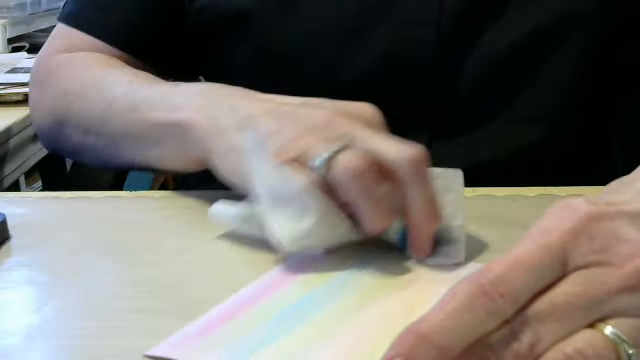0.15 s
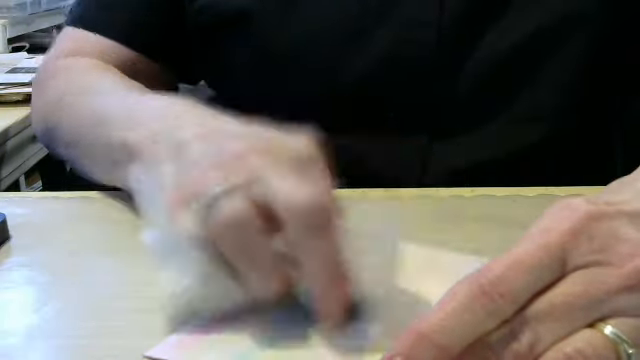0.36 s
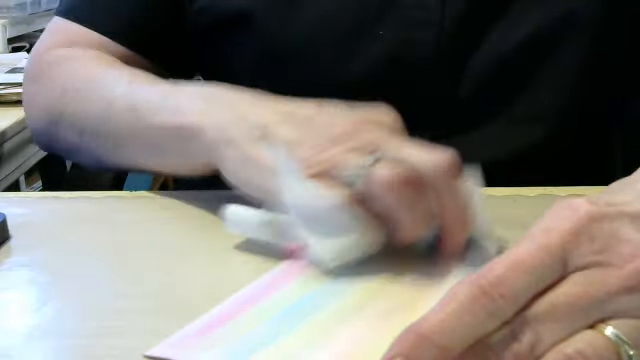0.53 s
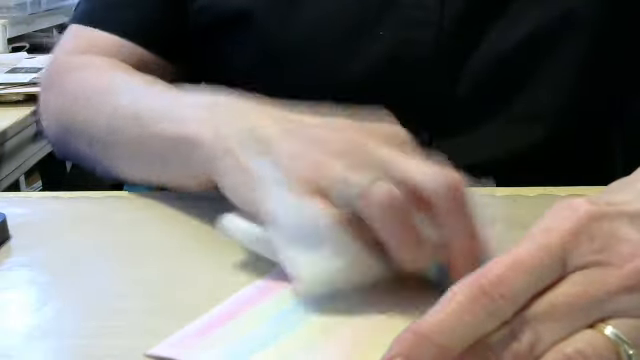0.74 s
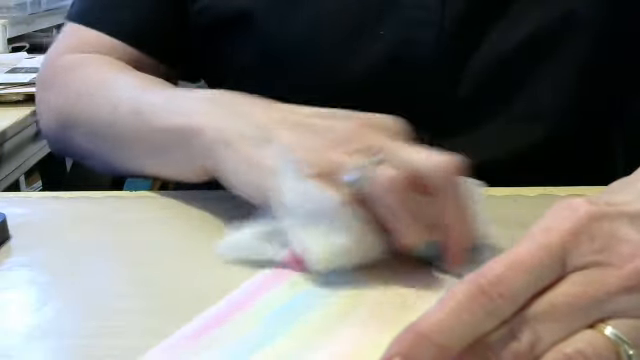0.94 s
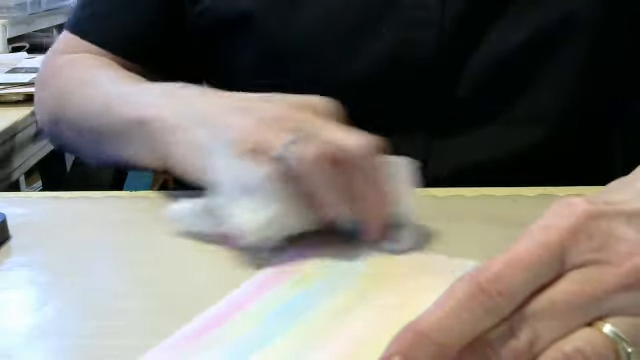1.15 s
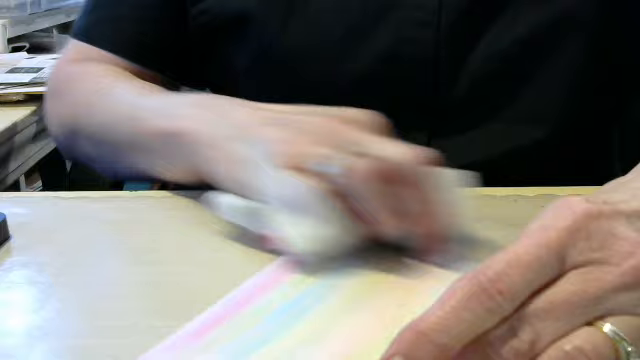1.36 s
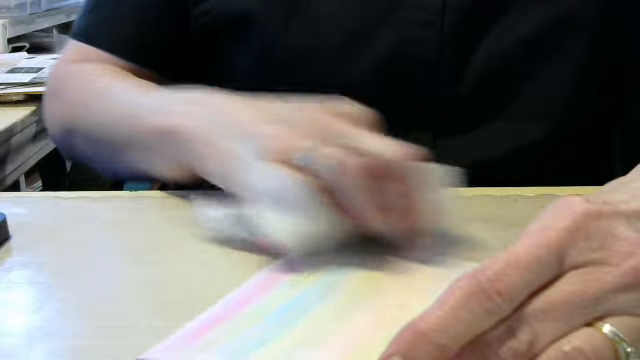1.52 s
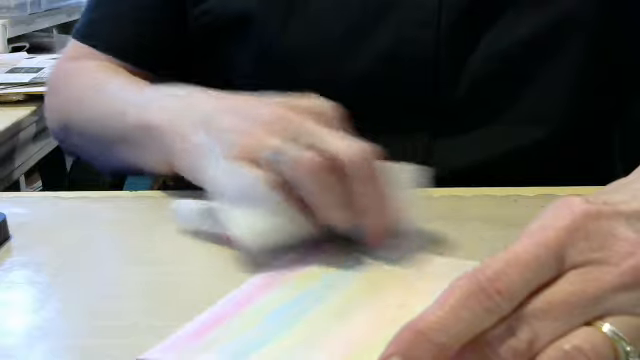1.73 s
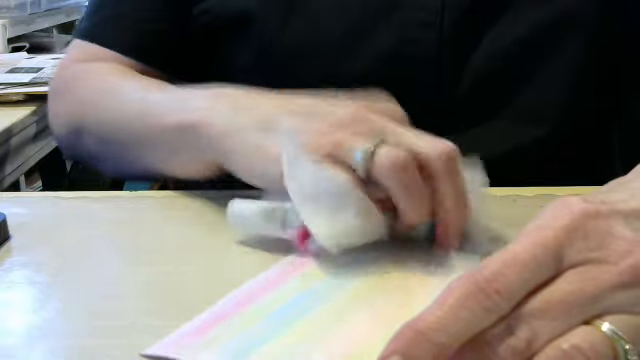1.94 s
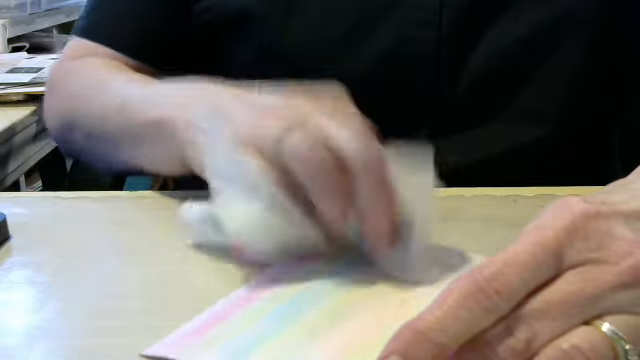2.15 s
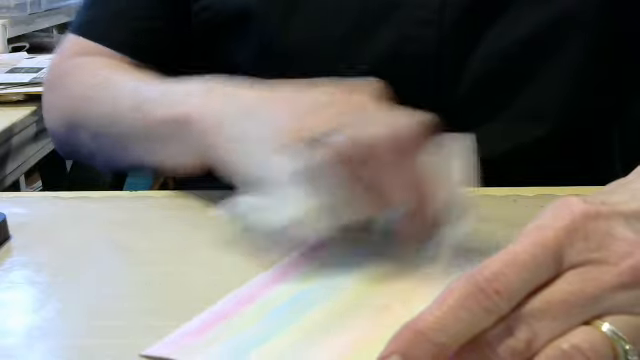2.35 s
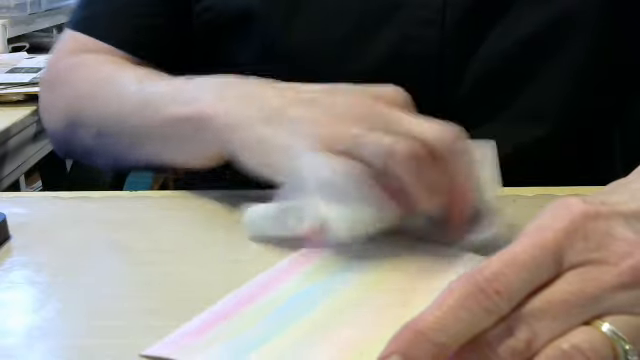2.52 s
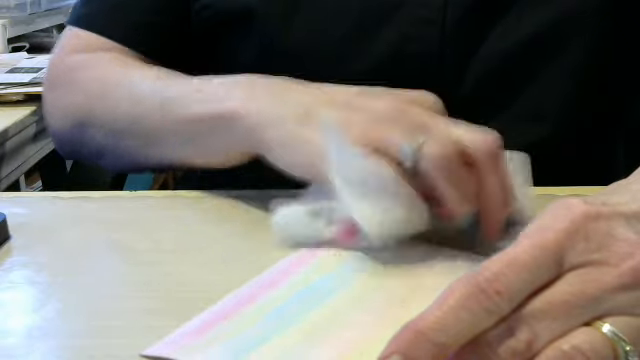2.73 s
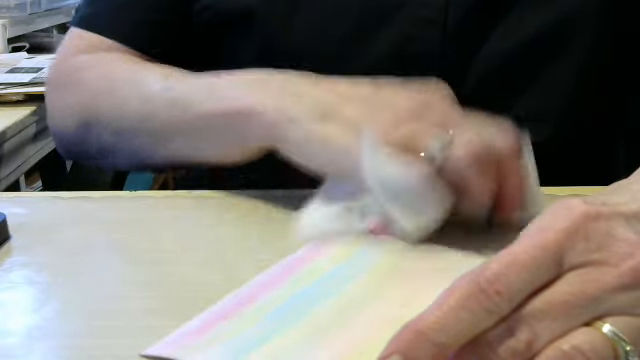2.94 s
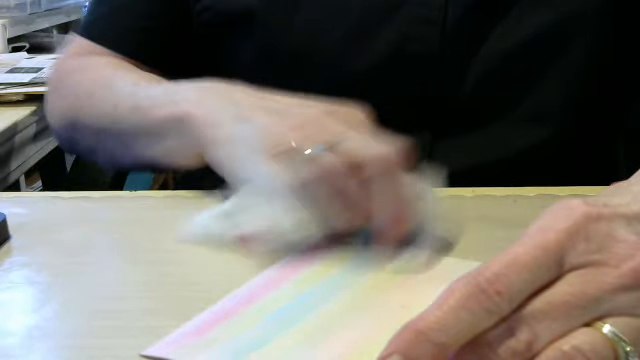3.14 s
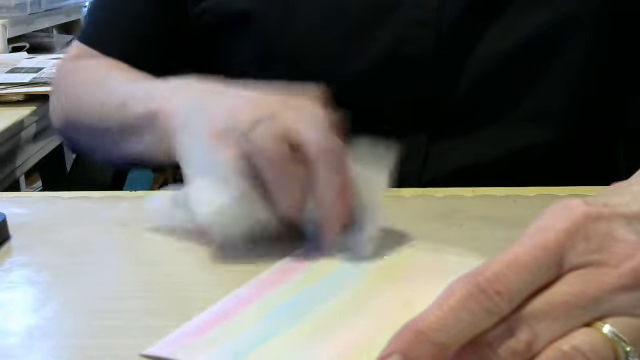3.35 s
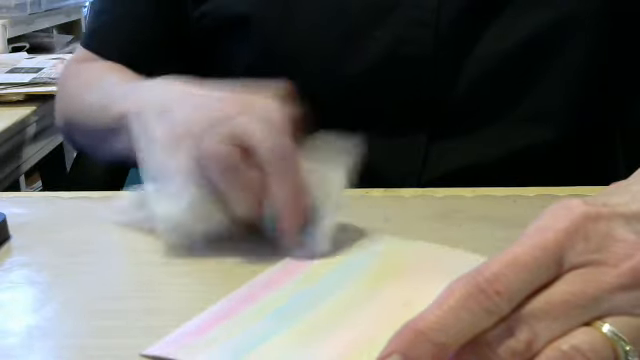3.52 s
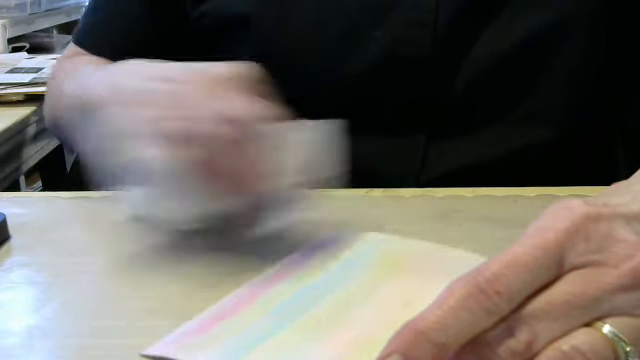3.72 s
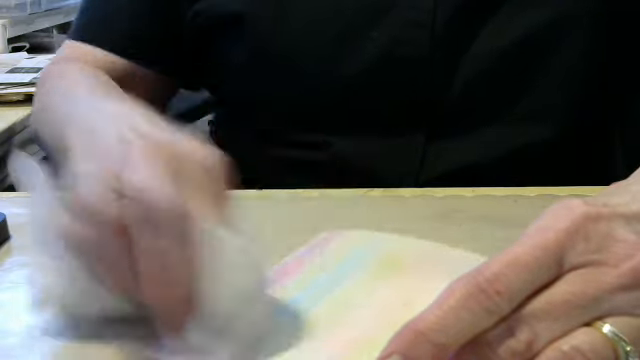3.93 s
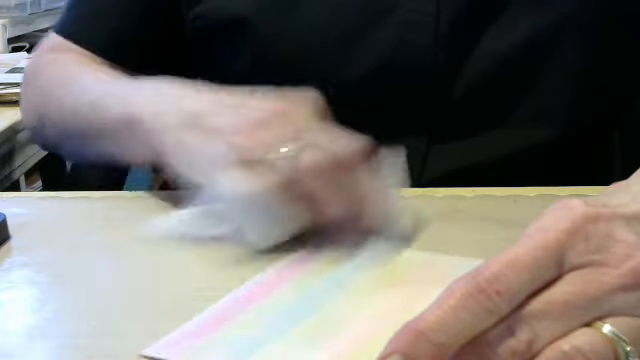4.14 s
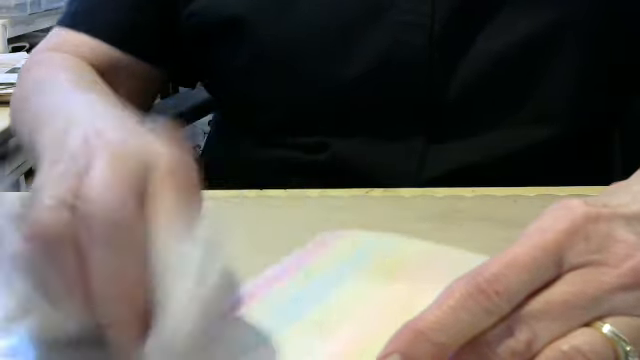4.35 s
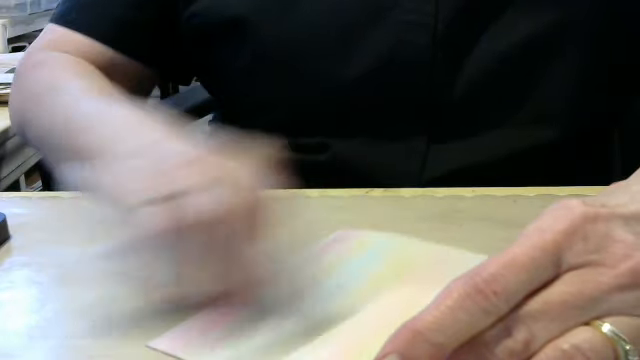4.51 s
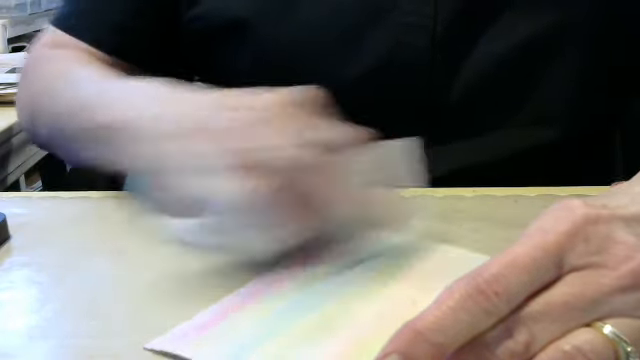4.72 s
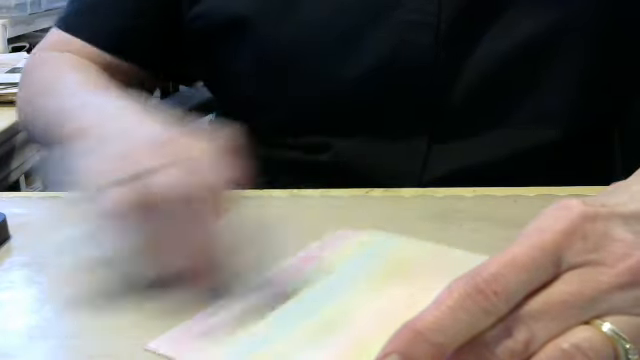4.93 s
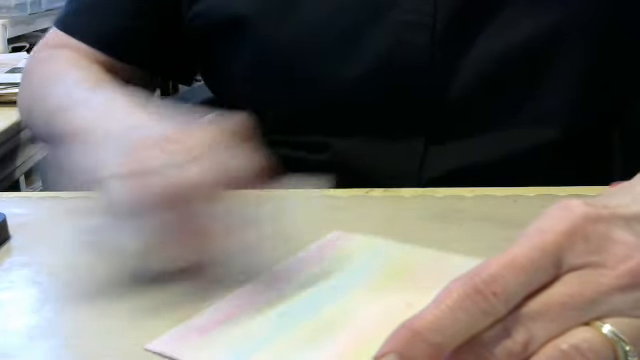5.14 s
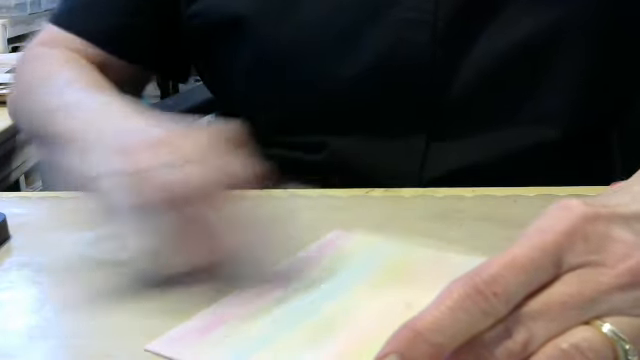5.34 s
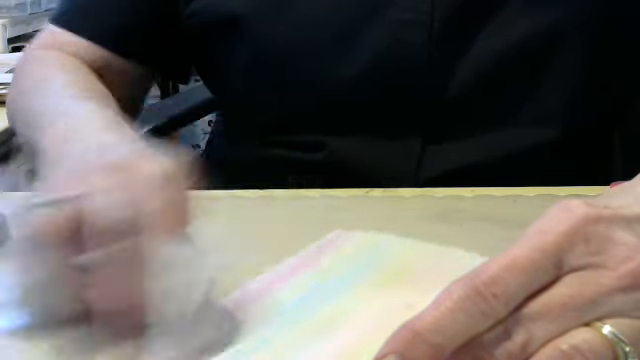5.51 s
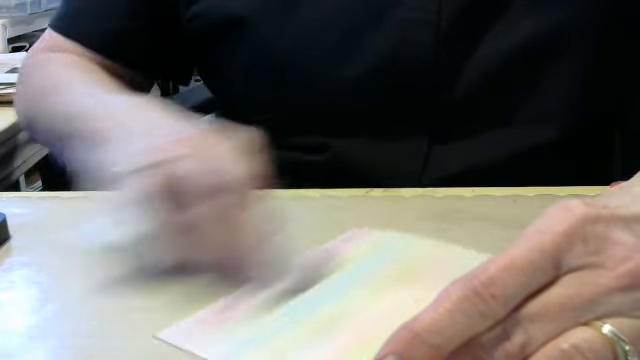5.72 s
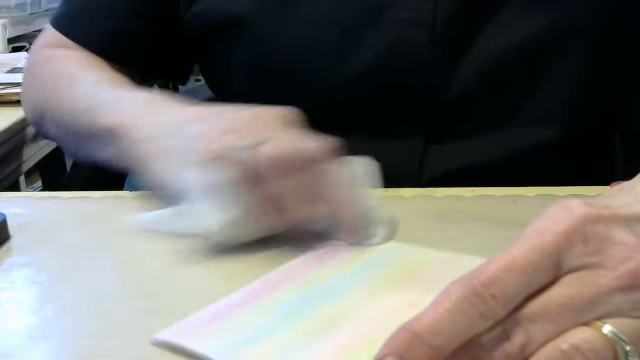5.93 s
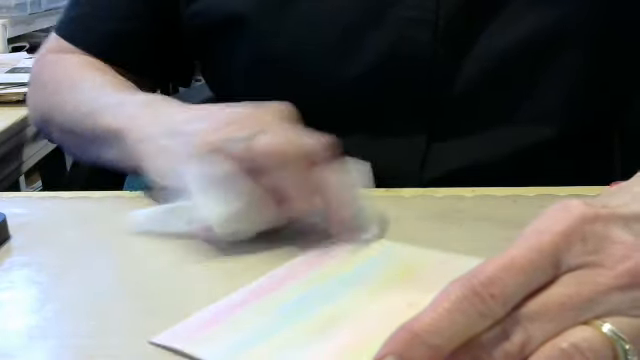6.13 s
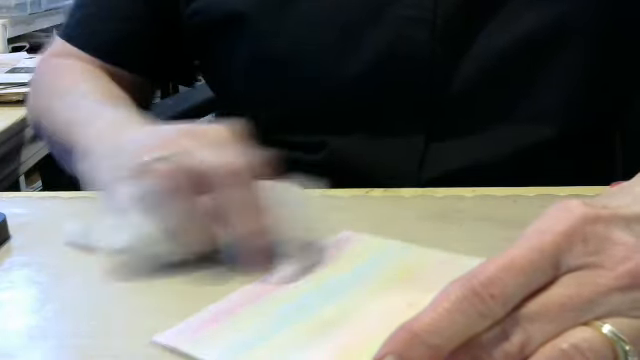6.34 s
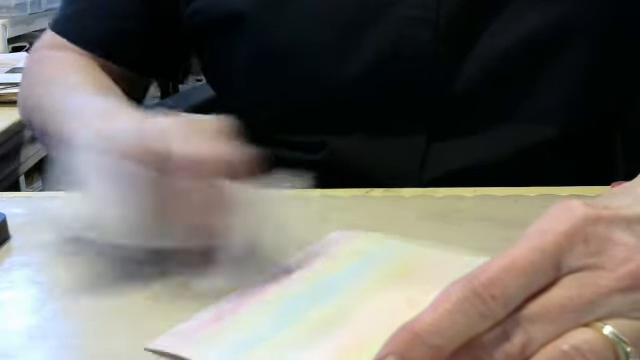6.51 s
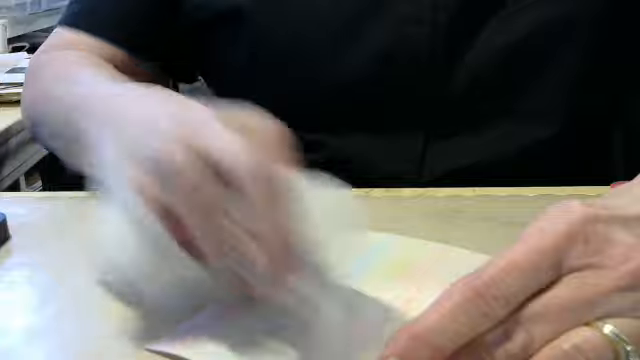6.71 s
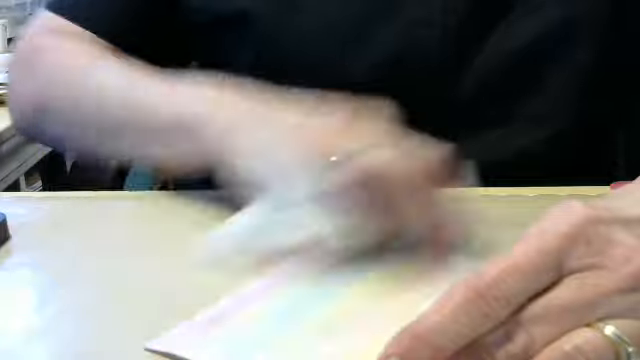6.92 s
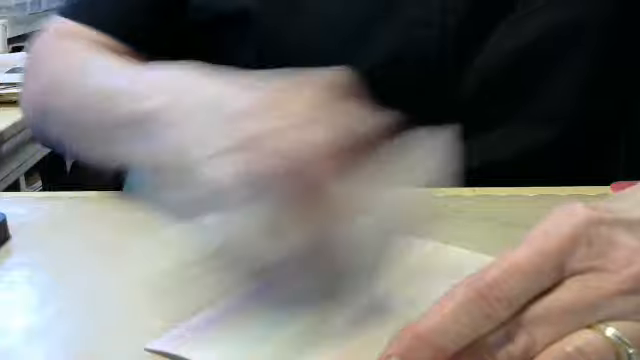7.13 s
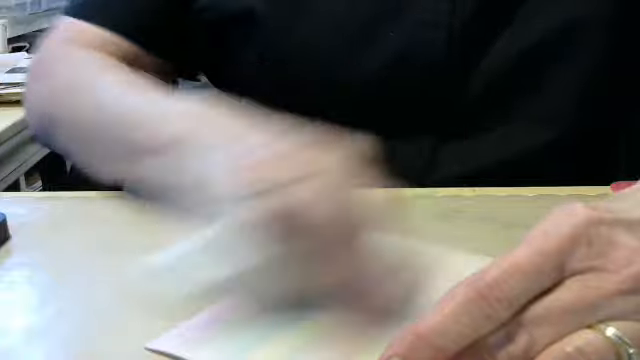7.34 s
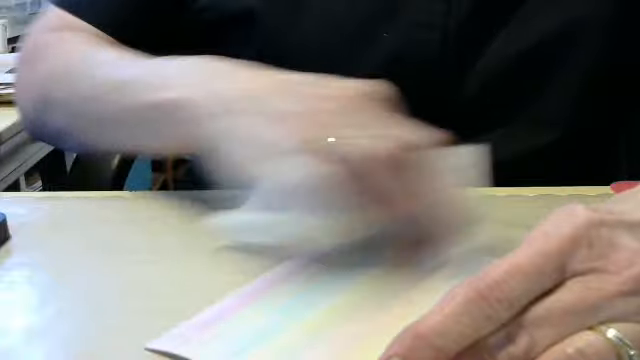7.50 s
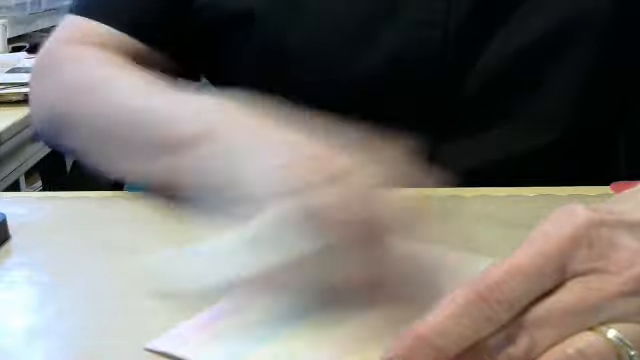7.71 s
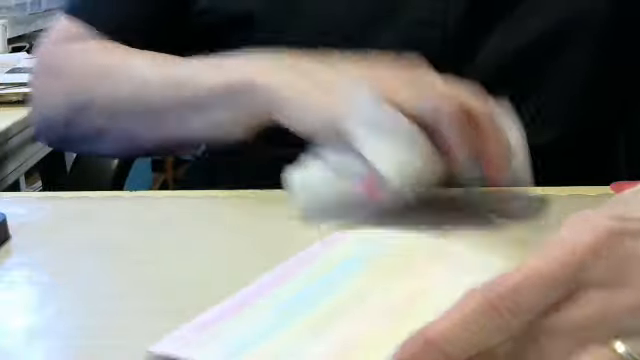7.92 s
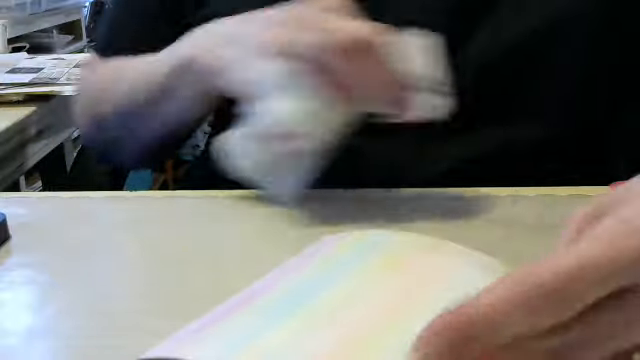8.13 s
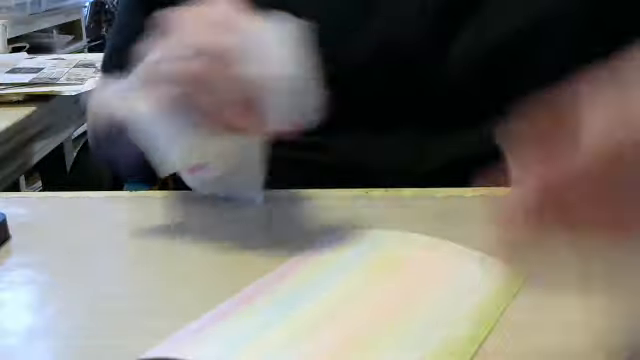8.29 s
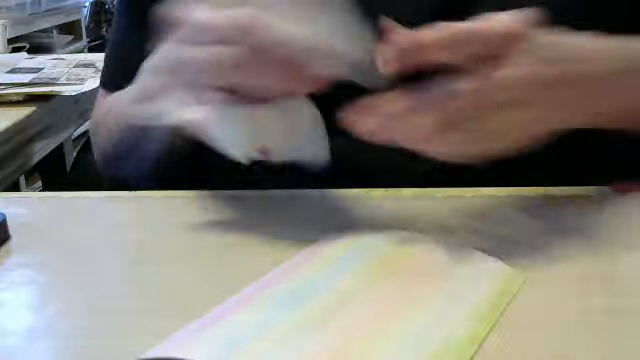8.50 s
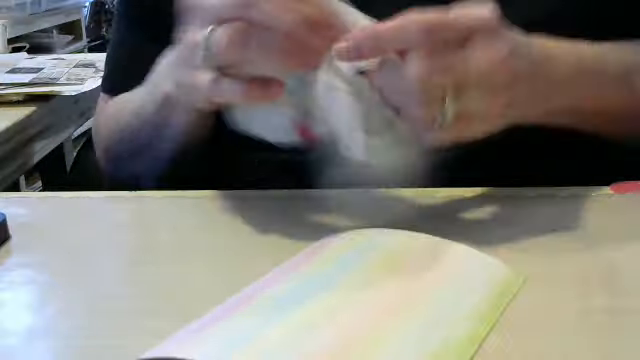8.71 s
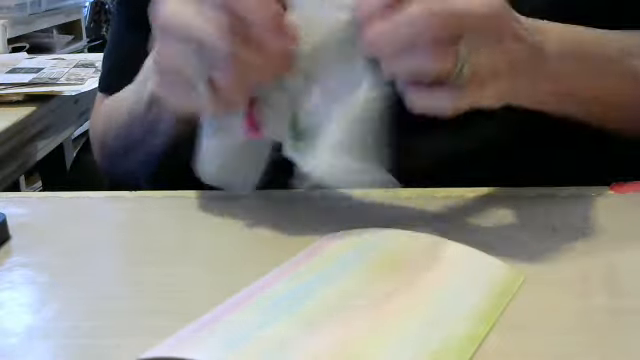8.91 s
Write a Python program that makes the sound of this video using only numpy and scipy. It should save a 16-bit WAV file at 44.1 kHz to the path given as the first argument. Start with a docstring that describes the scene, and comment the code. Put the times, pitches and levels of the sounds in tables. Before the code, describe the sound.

Soft pad rubbed briskly back and forth over paper on a tabletop, dry raspy strokes with sharp clicks, ending in a light rustle; faint hum.

```python
"""On a table in a small, faintly humming room, a soft pad is rubbed quickly back and forth over paper.
The microphone is close: dense noise and random clicks, shaped stroke by stroke, give rasp, scrape and fizz.
From the first seconds the table thuds dully and stray clicks snap; then the pad pats down between strokes.
Midway come tiny squeaks, a low groan and a heavy stroke that shakes the tabletop; a stronger shake follows.
Near the end the sheet buckles with sharp clicks, then the pad rustles in the hands."""
import sys
import numpy as np
from scipy import signal
from scipy.fft import rfft, irfft, next_fast_len
from scipy.io import wavfile

SR = 44100
rng = np.random.default_rng(int(sys.argv[2]) if len(sys.argv) > 2 else 0)


def wrap_up_sound(samples):
    """Save the sound to the file named by the first command line argument, as 16-bit audio."""
    columns = np.atleast_2d(samples).T
    # keep every value between -1 and 1, then stretch to whole-number steps
    tamed = np.clip(columns, -1, 1)
    steps = np.round(tamed * 32767).astype(np.int16)
    wavfile.write(sys.argv[1], SR, steps)


N = 399501
TIME = np.arange(N) / SR

# All levels are relative drives into the layers, except those of the room noise and hum.
# Room noise spectrum: (frequency [Hz], relative density [dB per Hz])
AIR_SPECTRUM = [(18, -57), (30, -22.5), (59, -20), (86, -11), (132, -4.5), (169, -5.5), (333, -10),
                (523, -19), (1030, -21), (1200, -27.5), (1360, -21.5), (1660, -26), (3260, -36),
                (6740, -29), (12000, -62.5), (15600, -88), (22000, -120)]
AIR_DB = -67.5  # rms
# Steady room hum: (frequency [Hz], rms level [dB])
HUM_TONES = [(120, -65.5), (191, -77), (335, -80.5), (1300, -83), (1395, -85.5)]

# Strokes of the pad: (start [s], length [s], attack [s], release [s], rasp level [dB],
# swell from start to end [dB], then over the rasp: scrape from pressure [dB],
# fizz from speed [dB], hollow ring of the loose sheet [dB])
STROKES = [(0, 0.013, 0.0056, 0.012, -45, -4, -13, -12, -31),
           (0.079, 0.0084, 0.0072, 0.012, -51.5, 7, -12, -35, -27),
           (0.182, 0.0053, 0.0077, 0.011, -50, 1, -14.5, -28, -27),
           (0.319, 0.077, 0.0094, 0.026, -41.5, 13, -9.5, -11.5, -40),
           (0.506, 0.11, 0.012, 0.017, -39, -2, -8.0, -9.5, -24.5),
           (0.874, 0.026, 0.012, 0.022, -44, 1.5, -6.5, -13.5, -23.5),
           (0.96, 0.087, 0.015, 0.027, -55.5, -2, -22, -25, -21),
           (1.059, 0.063, 0.024, 0.02, -46.5, -5, -6, -16, -31),
           (1.154, 0.032, 0.024, 0.032, -47, 1.5, -28, -13, -38),
           (1.321, 0.13, 0.014, 0.022, -45, 6.5, -13, -16.5, -38),
           (1.58, 0.13, 0.012, 0.022, -46, -6.5, -15.5, -13.5, -41.0),
           (1.794, 0.12, 0.007, 0.024, -44.5, -2, -11.5, -16, -36),
           (2.012, 0.025, 0.01, 0.023, -50.5, -9.5, -20, -16, -24),
           (2.258, 0.053, 0.014, 0.015, -42.5, -0.5, -11, -9.5, -16),
           (2.492, 0.05, 0.006, 0.019, -42.5, 0, -8, -10, -12.5),
           (2.717, 0.058, 0.004, 0.017, -44, 0.5, -8, -9, -22.5),
           (2.944, 0.076, 0.015, 0.022, -44.5, -4.5, -9, -12.5, -17),
           (3.214, 0.021, 0.0093, 0.019, -39.5, -2.5, -7.5, -8, -15),
           (3.451, 0.039, 0.0035, 0.006, -39, 5.5, -17.5, -11, -32),
           (3.662, 0.033, 0.021, 0.012, -40, 7.5, -11.5, -7, -29.0),
           (4.052, 0.17, 0.011, 0.008, -40, 2, -14.5, -7, -33.5),
           (4.596, 0.12, 0.015, 0.019, -36.5, -9.5, -14.5, -7, -28.5),
           (5, 0.095, 0.019, 0.008, -40, -4.5, -12.5, -4.5, -30),
           (5.162, 0.088, 0.0039, 0.024, -35, -3, -16, -6, -45),
           (5.369, 0.081, 0.0082, 0.01, -38, -1.5, -18.5, -6.5, -33.5),
           (5.507, 0.1, 0.0028, 0.021, -36.5, -3, -18.5, -3.5, -35),
           (5.749, 0.085, 0.011, 0.04, -39, -5, -13.5, -6, -30.5),
           (5.855, 0.052, 0.015, 0.02, -39.5, 1, -11, -5.5, -47),
           (6.015, 0.041, 0.0056, 0.018, -34, -5, -18, -5.5, -34),
           (6.153, 0.063, 0.0091, 0.012, -40.5, -1.5, -18, -6, -35.0),
           (6.282, 0.06, 0.001, 0.016, -34.0, -6, -13.5, -7, -43),
           (6.42, 0.053, 0.011, 0.012, -41.5, -2, -17.0, -7.5, -38.0),
           (6.553, 0.032, 0.0061, 0.014, -34, -4, -14, -7.0, -37),
           (6.893, 0.14, 0.0094, 0.014, -39.5, -7.5, -8.0, -7, -20.0),
           (7.348, 0.14, 0.014, 0.019, -40, -1.5, -9.0, -5.5, -20),
           (7.566, 0.012, 0.0049, 0.0062, -53.5, -2, -37, -6, -33.0),
           (7.793, 0.079, 0.024, 0.019, -40, -5.0, -7.0, -7, -17.5)]
ARCH_DB = 3  # the hand is fastest in mid-stroke: the two ends are this much softer
ONSET_POWER, FADE_POWER = 2.63, 2.66  # how steeply a movement sets in, and dies away
GRAZE_DB, GRAZE_S = -29.5, 0.068  # the pad still grazes the surface around each movement
# Rasp of paper fibres: (frequency [Hz], relative density [dB per Hz])
RASP_SPECTRUM = [(500, -45), (2400, -32.5), (2900, -12.5), (3450, -14), (4100, -6), (5300, -3), (6400, 3.5),
                 (7300, 2.5), (8100, -10), (9000, -20), (10500, -50.5), (12500, -56)]
# Lower scrape under pressure: (frequency [Hz], relative density [dB per Hz])
SCRAPE_SPECTRUM = [(100, -45), (300, -7.5), (520, -6.5), (680, -37), (1150, -12), (1500, 1), (1800, 3),
                   (2150, 3.5), (2500, 1.5), (2900, 3), (3500, 1), (4200, 6.5), (5500, -1.5), (8000, -70)]
# Fizz of a fast pad: (frequency [Hz], relative density [dB per Hz])
FIZZ_SPECTRUM = [(1000, -62), (6000, -21.5), (7300, 4.5), (8100, 3.5), (9000, -5), (10000, -12),
                 (11000, -26), (12600, -46.5)]
# Hollow ring of the loose sheet: (frequency [Hz], relative density [dB per Hz])
HOLLOW_SPECTRUM = [(100, -28.5), (400, -11), (520, -4.5), (680, -13.5), (820, 1), (940, 2.5), (1100, -8),
                   (1350, -23), (3000, -41.5)]
SLIDE_FROM_HZ, SLIDE_TO_HZ = 1310, 844  # the sheet's resonance sinks as the pad travels along it

# Resonances of the tabletop: (frequency [Hz], width [Hz], relative level [dB])
TABLE_MODES = [(121, 15, -5.5), (247, 26, 14), (314, 26, -10.5), (378, 26, -4), (502, 12, -5.5)]
# Heavy drags that make the tabletop drone: (start [s], length [s], attack [s], release [s],
# level [dB], swell [dB], higher judder over that level [dB])
DRAGS = [(5.535, 0.023, 0.015, 0.013, -50, -1, -20), (7.795, 0.042, 0.0016, 0.012, -40, -6, -3)]
# Soft bumps of the arm on the table: (time [s], level [dB])
ARM_BUMPS = [(0.204, -50.5), (0.831, -51), (1.135, -56), (1.435, -56.5), (5.083, -51), (5.527, -58),
             (6.05, -54), (6.17, -50), (6.285, -65), (7.309, -46), (7.794, -33), (8.417, -64), (8.797, -53)]
# Dull colour of arm on table: (frequency [Hz], relative density [dB per Hz])
BUMP_SPECTRUM = [(30, -49.5), (80, -6.5), (130, 3.5), (230, -1.5), (400, -13), (1000, -45)]

# Sharp clicks and snaps: (time [s], snap level [dB], knock level [dB], centre of the snap [Hz])
CLICKS = [(0.6888, -49, -58, 1600), (2.193, -45.5, -76, 4470), (3.1813, -11, -32, 4760),
          (3.244, -29, -56, 6500), (4.2261, -26.5, -53, 6640), (4.3015, -38, -73, 6800),
          (4.3063, -26.5, -56, 7000), (7.9946, -39, -67, 8300), (8.04, -45, -59, 7000),
          (8.090, -36, -55, 8150), (8.1119, -23.5, -32, 5760), (8.1386, -16, -30.5, 5300),
          (8.1543, -23, -38.5, 5470), (8.2101, -16.5, -65, 8160), (8.3593, -31, -62, 5660),
          (8.803, -41, -75, 6200), (8.954, -52, -73, 5700)]
# Bright snap of paper: (frequency [Hz], relative density [dB per Hz])
SNAP_SPECTRUM = [(100, -29), (600, -33), (1500, 0), (3000, 2.5), (5300, -4.5), (7000, 5), (8500, -5.5),
                 (10500, -14), (12600, -36.5)]
# Knock on the table: (frequency [Hz], relative density [dB per Hz])
KNOCK_SPECTRUM = [(60, -49), (250, -2), (390, 6.5), (540, -2.5), (840, 7.5), (1080, 1), (1320, 3),
                  (2000, -4), (2630, 0.5), (3600, -13), (7000, -50)]
# Woody ring of a hard click: (frequency [Hz], relative level [dB], t60 [s])
WOOD_MODES = [(413, 2, 0.07), (816, -9.5, 0.052), (926, -6, 0.089), (1355, -9, 0.06), (1600, -14.5, 0.18),
              (1720, -15, 0.22), (1823, 1, 0.14), (1940, -6, 0.07), (2560, -11, 0.1), (3600, -3, .06),
              (4400, 2, 0.037)]

# Pats of the pad on the sheet: (time [s], brush level [dB], knock level [dB])
PATS = [(2.245, -34.5, -52.5), (2.478, -38.5, -46.5), (2.712, -39, -61.5), (3.181, -29.5, -44),
        (3.428, -31.5, -44), (3.632, -39, -55.5), (4.065, -44, -53), (4.3, -36.5, -56), (4.535, -46.5, -64),
        (4.963, -43, -57), (6.886, -45, -69)]
# Instants where the pad sticks and squeaks: (time [s], pitch [Hz], level [dB])
SQUEAKS = [(4.8336, 4670, -38.5), (4.8415, 4660, -53.5), (4.8485, 5700, -51.5), (4.861, 6500, -49)]
# Low groan of the pad juddering on the table: (start [s], length [s], attack [s], release [s],
# level [dB], swell [dB], pitch [Hz])
GROANS = [(5.581, 0.056, .008, 0.012, -55.5, 0, 252.5)]
# The sheet buckles and springs up as it is let go: (start [s], length [s], attack [s], release [s],
# level [dB], swell [dB])
BUCKLES = [(8.111, 0.059, 0.006, 0.02, -48, -4)]
# Crumple of creases: (frequency [Hz], relative density [dB per Hz])
CRUMPLE_SPECTRUM = [(300, -28), (800, -8), (1200, -2), (1650, 9), (2100, -2), (2700, -4), (4500, -7),
                    (7000, -9), (11000, -36)]
# The pad handled in the air: (start [s], length [s], attack [s], release [s], level [dB], swell [dB])
RUSTLES = [(8.632, 0.016, 0.019, 0.011, -55.5, 1.5), (8.745, .035, 0.016, 0.0097, -49, 8.5),
           (8.857, 0.027, 0.0067, 0.014, -52.5, 5), (8.955, 0.0085, 0.009, 0.019, -52.5, -3),
           (9.048, .02, 0.01, .015, -53, 10)]
# Rustle of the pad, also its brush and scuff: (frequency [Hz], relative density [dB per Hz])
RUSTLE_SPECTRUM = [(1500, -11.5), (2600, -20.5), (3400, -5.5), (4600, 0), (6300, 5.5), (7200, 1),
                   (8500, -10.5), (11000, -46)]

# Decay of the small room: (frequency [Hz], t60 [s])
ROOM_DECAY = [(200, 0.14), (1500, 0.18), (7000, 0.06), (12000, 0.24)]
EDGE_HZ = 12700  # upper band limit of the recorder


def amp(db):
    """Decibels to gain."""
    return 10 ** (np.asarray(db) / 20)


def evened(x):
    """Scales to rms 1."""
    return x / np.sqrt(np.mean(x ** 2) + 1e-20)


def read(points, hz):
    """Reads a spectrum on a log-frequency axis."""
    f, value = np.transpose(points)
    return np.interp(np.log(hz + 1), np.log(f), value)


def add(mix, s, sound):
    """Mixes a sound in at time s."""
    part = mix[max(round(s * SR), 0):][:len(sound)]
    part += sound[:len(part)]


def ring(points, size=4096):
    """Causal (minimum-phase) impulse response of unit energy with the given spectrum."""
    log_gain = np.log(amp(read(points, abs(np.fft.fftfreq(size, 1 / SR)))))
    response = np.fft.ifft(np.exp(np.conj(signal.hilbert(log_gain)))).real[:size // 2]
    return response / np.linalg.norm(response)


def colour(x, points):
    """Passes x through a body with the given spectrum."""
    return signal.oaconvolve(x, ring(points))[:len(x)]


def wander(hz):
    """Slow random sway of rms 1; faster sway fades out around the given rate."""
    size = next_fast_len(N, real=True)
    spectrum = rfft(rng.standard_normal(size))
    spectrum *= np.exp(-(np.fft.rfftfreq(size, 1 / SR) / hz) ** 2)
    return evened(irfft(spectrum, size)[:N])


def puff(rise, t60, size=6000):
    """A short burst of noise that swells and dies."""
    t = np.arange(size) / SR
    return rng.standard_normal(size) * (1 - np.exp(-t / rise)) * np.exp(-np.log(1000) * t / t60)


def slips(per_s, spread_db, clump_db, clump_hz, smooth_share):
    """Fibres let go as tiny clicks of uneven size over a smooth hiss of countless smaller ones, all in clumps."""
    size = amp(spread_db * np.minimum(rng.exponential(1, N), 4))
    clicks = size * rng.choice([-1, 1], N) * (rng.random(N) < per_s / SR)
    hiss = rng.standard_normal(N)
    mixed = np.sqrt(1 - smooth_share) * evened(clicks) + np.sqrt(smooth_share) * hiss
    return evened(mixed * amp(clump_db * wander(clump_hz)))


def movement(start, length, attack, release, level_db, swell_db, follow=1., reach=.12):
    """Start time and gain of one hand movement; a high follow keeps a sound to the fastest part."""
    t = np.arange(-reach, length + reach, 1 / SR)
    along = np.clip(t / length, 0, 1)
    before, after = np.maximum(-t, 0), np.maximum(t - length, 0)
    edges = 1 / (1 + (before / attack) ** ONSET_POWER + (after / release) ** FADE_POWER)
    graze = amp(GRAZE_DB) * np.exp(-((before + after) / GRAZE_S) ** 2)
    speed = amp(-ARCH_DB * (2 * along - 1) ** 2) * np.hypot(edges, graze)
    gain = amp(level_db + swell_db * (along - .5)) * speed ** follow
    return start - reach, gain[max(round((reach - start) * SR), 0):]


def effort(rows, index=None, follow=1., swell_db=0.):
    """Gain over time of a table of movements; index picks a column of dB added to each one's level."""
    power = np.zeros(N)
    for row in rows:
        extra_db = 0 if index is None else row[index]
        s, gain = movement(*row[:4], row[4] + extra_db, row[5] + swell_db, follow)
        add(power, s, gain ** 2)
    return np.sqrt(power)


def background(waver=0.26):
    """Dull room noise and a hum whose phase wavers slightly, more so in its higher tones."""
    sound = amp(AIR_DB) * evened(colour(rng.standard_normal(N), AIR_SPECTRUM))
    for hz, db in HUM_TONES:
        phase = 2 * np.pi * hz * TIME + waver * hz / HUM_TONES[0][0] * wander(5.5)
        sound += amp(db) * np.sqrt(2) * np.sin(phase)
    return sound


def resonate(x, hz, width_hz):
    """A resonance of gain 1 that follows the curve hz: x is shifted to zero pitch, smoothed, shifted back."""
    turn, r = np.exp(2j * np.pi * np.cumsum(hz) / SR), np.exp(-np.pi * width_hz / SR)
    smooth = signal.lfilter([(1 - r) ** 2], [1, -2 * r, r * r], x / turn)
    return 2 * (turn * smooth).real


def sliding(width_hz=320.0):
    """Noise through the sheet's resonance, which starts high in every stroke and sinks to its end."""
    times = [s for start, length, *_ in STROKES for s in (start, start + length)]
    hz = np.interp(TIME, np.maximum.accumulate(times), [SLIDE_FROM_HZ, SLIDE_TO_HZ] * len(STROKES))
    return evened(resonate(rng.standard_normal(N), hz, width_hz))


def off_the_hand(x, echo_db=-9.5, delay=0.0009, sway=0.253):
    """A reflection from the moving hand slides its delay [s], so the colour keeps shifting."""
    late = delay * np.exp(sway * wander(2.99))
    return x + amp(echo_db) * np.interp(TIME - late, TIME, x)


def rubbing(scrape_db=-.5, hollow_db=-1.5, slide_db=-5.0):
    """Slips rasp on paper; pressure adds a lower scrape, speed a fizz, and the sheet rings where it lies loose."""
    catch = slips(per_s=1500, spread_db=-1.0, clump_db=1.64, clump_hz=135, smooth_share=0.81)
    fine = slips(per_s=2300, spread_db=2.0, clump_db=-0.1, clump_hz=140, smooth_share=0.49)
    drag = slips(per_s=2500, spread_db=3.0, clump_db=0.4, clump_hz=112, smooth_share=0.57)
    pressure = amp(2.8 * wander(13)) * effort(STROKES, index=6, follow=0.81, swell_db=2.0)
    speed = effort(STROKES, index=7, follow=0.98, swell_db=-1.2)
    looseness = effort(STROKES, index=8, follow=0.94, swell_db=2.5)
    rasp = colour(catch * effort(STROKES, follow=1.053, swell_db=0.6), RASP_SPECTRUM)
    scrape = amp(scrape_db) * colour(drag * pressure, SCRAPE_SPECTRUM)
    fizz = colour(fine * speed, FIZZ_SPECTRUM)
    sheet = amp(hollow_db) * colour(catch, HOLLOW_SPECTRUM) + amp(slide_db) * sliding()
    return off_the_hand(rasp + scrape + fizz + sheet * looseness)


def tabletop(bump_db=4.0, rub_db=-79.5, weight_db=-72.5, size=8192):
    """Strokes stir the table's resonances a little, heavy drags a lot; the arm leans unevenly and bumps dully."""
    t = np.arange(size) / SR
    modes = [amp(db) * width * np.exp(-np.pi * width * t) * np.cos(2 * np.pi * hz * t)
             for hz, width, db in TABLE_MODES]
    push = rng.standard_normal(N)
    # the lower three modes drone, the upper two judder
    low, high = (evened(signal.oaconvolve(push, half.sum(0))[:N])
                 for half in np.array_split(np.array(modes), 2))
    stroking = evened(effort(STROKES) ** 0.21 * amp(4.8 * wander(15)))
    judder = effort(DRAGS, index=6, swell_db=-7.)
    drone = low * effort(DRAGS) + high * (judder + amp(rub_db) * stroking)
    arm = amp(weight_db) * evened(rng.standard_normal(N) * amp(5.5 * wander(18)))
    for s, level in ARM_BUMPS:
        add(arm, s, amp(level + bump_db) * puff(rise=0.0066, t60=0.091))
    lowpass = signal.butter(2, 800, fs=SR, output="sos")
    return signal.sosfilt(lowpass, drone) + colour(arm, BUMP_SPECTRUM)


def clicks(snap_db=11.5, chatter_db=-18.0, settle_db=-35.5, knock_db=-1.0, wood_db=-9.0,
           scuff_db=-41.0, scuff_lead=0.0055, width_hz=1880.0, size=12000):
    """A faint scuff, a pitched snap, brief chatter and the paper settling, with a knock and woody ring."""
    snap, knock = np.zeros((2, N))
    for s, level, low, hz in CLICKS:
        burst = amp(chatter_db) * puff(rise=.0001, t60=0.013) + amp(settle_db) * puff(rise=0.0023, t60=0.11)
        burst[0] += 1
        pitched = signal.lfilter(*signal.iirpeak(hz, hz / width_hz, SR), burst)
        add(snap, s, amp(level + snap_db) * pitched)
        add(snap, s - scuff_lead, amp(level + snap_db + scuff_db) * puff(rise=0.0027, t60=0.017))
        add(knock, s, amp(low) * puff(rise=0.000085, t60=0.046))
    t = np.arange(size) / SR
    modes = sum(amp(db - 60 * t / t60) * np.sin(2 * np.pi * hz * t) for hz, db, t60 in WOOD_MODES)
    ringing = signal.oaconvolve(knock, modes / np.linalg.norm(modes))[:N]
    knocking = amp(knock_db) * colour(knock, KNOCK_SPECTRUM)
    return colour(snap, SNAP_SPECTRUM) + knocking + amp(wood_db) * ringing


def pats(touch_db=-2.0, brush_db=5.0, pat_db=7.0, lead=.011):
    """The pad's edge brushes the sheet first, then the hand's weight lands on the table."""
    brush, knock = np.zeros((2, N))
    for s, high, low in PATS:
        add(brush, s - lead, amp(high + touch_db) * puff(rise=0.015, t60=0.069))
        add(brush, s - .002, amp(high + brush_db) * puff(rise=0.0029, t60=0.028))
        add(knock, s - .001, amp(low + pat_db) * puff(rise=0.0021, t60=0.067))
    return colour(brush, RUSTLE_SPECTRUM) + colour(knock, KNOCK_SPECTRUM)


def squeaks(length=0.0046, rough=0.043, scuff_db=-22.0):
    """Two or three dozen uneven cycles of stick and slip each, with a scuff of fibres."""
    out, t = np.zeros(N), np.arange(0, length, 1 / SR)
    for s, hz, db in SQUEAKS:
        turns = np.cumsum(hz * (1 + rough * rng.standard_normal(len(t)))) / SR
        swell = np.sin(np.pi * np.sqrt(t / length)) ** 2
        add(out, s, amp(db) * swell * np.sin(2 * np.pi * turns))
        add(out, s, amp(db + scuff_db) * colour(puff(rise=.0005, t60=0.16), RUSTLE_SPECTRUM))
    return out


def groaning(octave_db=4.5, jitter=0.058):
    """The pad sticks and slips almost regularly: a low tone and its octave."""
    out, unsteady = np.zeros(N), wander(60)
    for *shape, hz in GROANS:
        s, gain = movement(*shape)
        phase = 2 * np.pi * np.cumsum(hz * (1 + jitter * unsteady[:len(gain)])) / SR
        add(out, s, gain * (np.sin(phase) + amp(octave_db) * np.sin(2 * phase)))
    return out


def buckling():
    """Creases snap over in a quick, uneven crumple."""
    creases = slips(per_s=950, spread_db=6.0, clump_db=2.5, clump_hz=120, smooth_share=0.41)
    return colour(creases * effort(BUCKLES), CRUMPLE_SPECTRUM)


def rustling():
    """The loose pad crinkles softly between the fingers."""
    crinkle = slips(per_s=1400, spread_db=0.5, clump_db=2.5, clump_hz=80, smooth_share=0.72)
    return colour(crinkle * effort(RUSTLES, follow=0.64), RUSTLE_SPECTRUM)


def room(x, near_db=-13.5, near_t60=0.061, tail_db=-17.0, size=20000):
    """Quick reflections from table and hands, then the faint tail of a small room."""
    near, far = rng.standard_normal((2, size)) * (rng.random((2, size)) < 3000 / SR)
    delay = np.arange(size) / SR
    near = near * np.exp(-np.log(1000) * delay / near_t60) * (delay > .0006)
    # the tail decays at its own rate in each frequency band
    hz, t, bands = signal.stft(far * (delay > .005), SR, nperseg=256)
    decay = np.exp(-np.log(1000) * t / read(ROOM_DECAY, hz)[:, None])
    far = signal.istft(bands * decay, SR, nperseg=256)[1][:size]
    response = amp(near_db) * near / np.linalg.norm(near) + amp(tail_db) * far / np.linalg.norm(far)
    return x + signal.oaconvolve(x, response)[:N]


def scene():
    """Everything on the table, heard close up in the room, over the room's own noise and hum."""
    strokes = rubbing() + tabletop()
    touches = clicks() + pats() + squeaks() + groaning()
    ending = buckling() + rustling()
    return (background() + room(strokes + touches + ending))[None]


def record(dry, bass_hz=45.):
    """A small microphone loses the deep bass; then the recorder's band limit."""
    highpass = signal.butter(2, bass_hz, "highpass", fs=SR, output="sos")
    thin = signal.sosfilt(highpass, dry)
    band_limit = signal.firwin(511, EDGE_HZ, window=("kaiser", 9), fs=SR)
    return signal.oaconvolve(thin, band_limit[None], "same")


dry = scene()
out = record(dry)
wrap_up_sound(out)
```